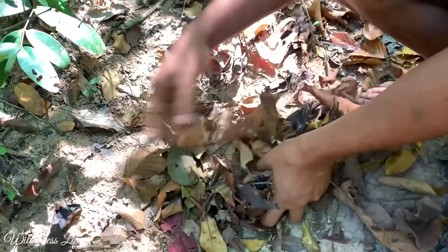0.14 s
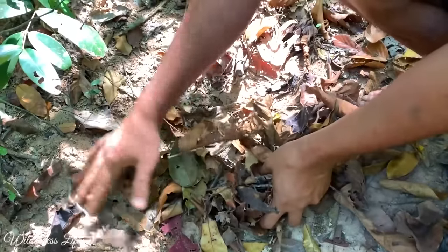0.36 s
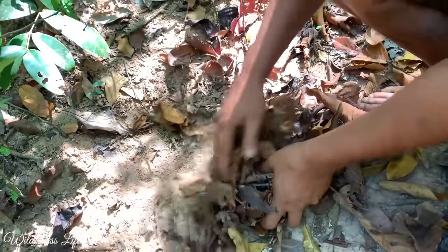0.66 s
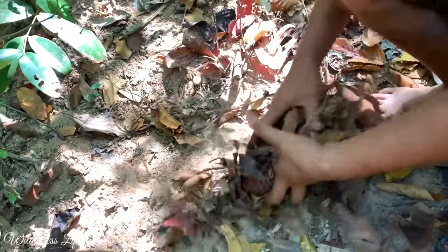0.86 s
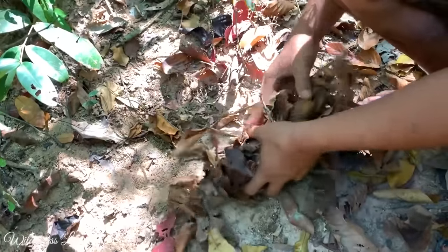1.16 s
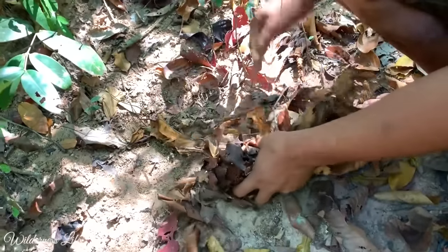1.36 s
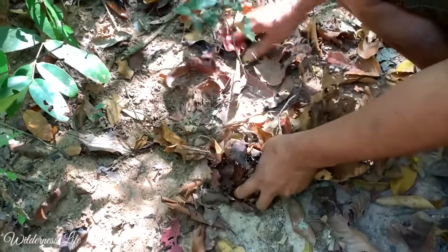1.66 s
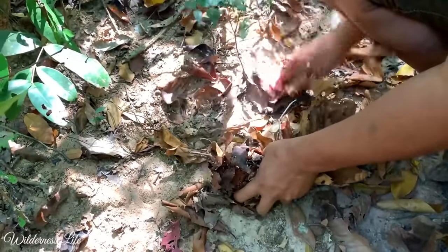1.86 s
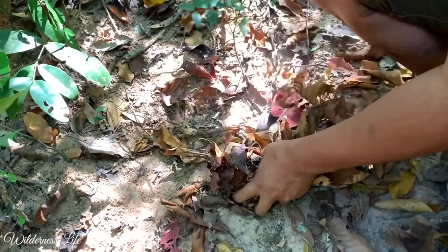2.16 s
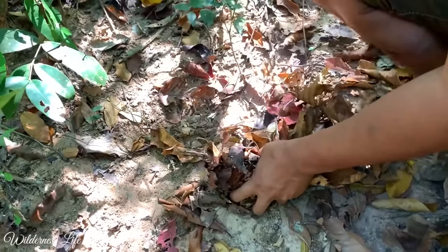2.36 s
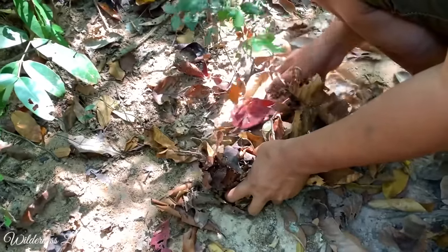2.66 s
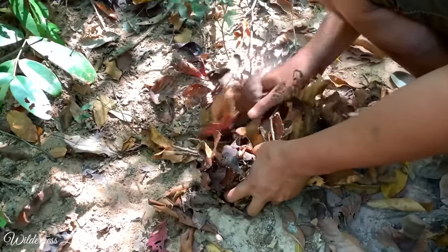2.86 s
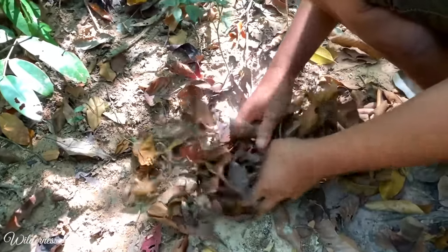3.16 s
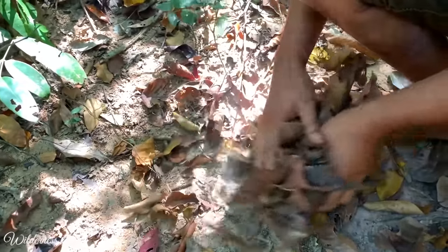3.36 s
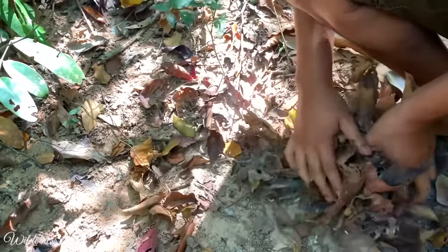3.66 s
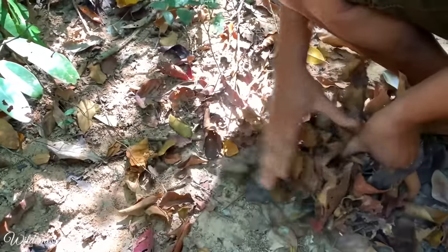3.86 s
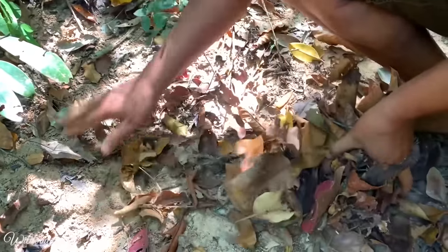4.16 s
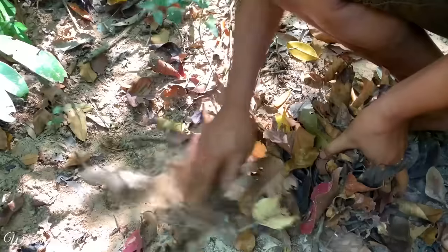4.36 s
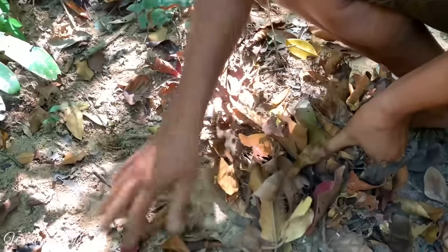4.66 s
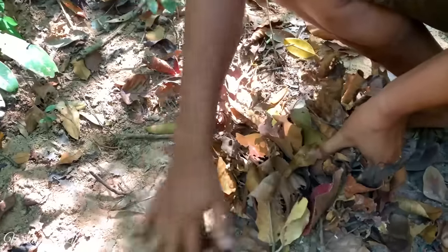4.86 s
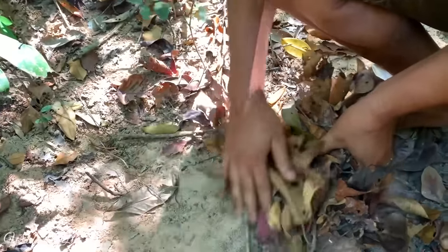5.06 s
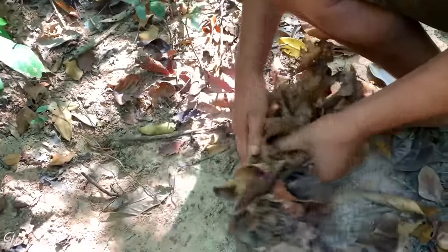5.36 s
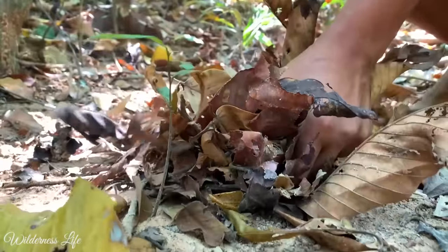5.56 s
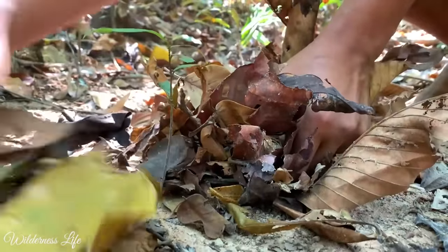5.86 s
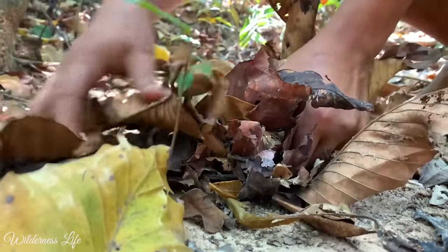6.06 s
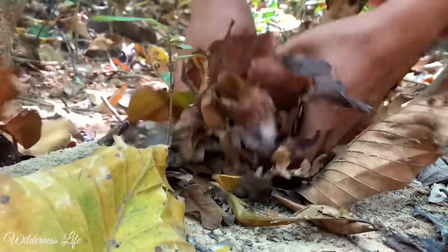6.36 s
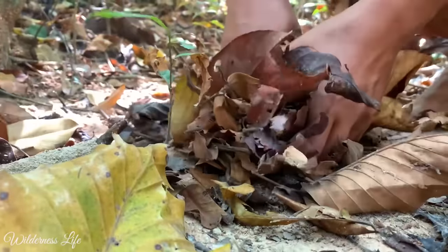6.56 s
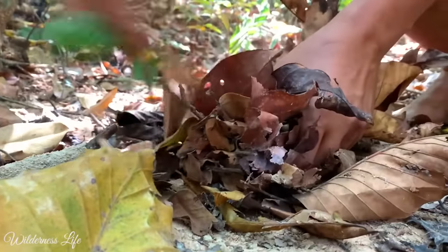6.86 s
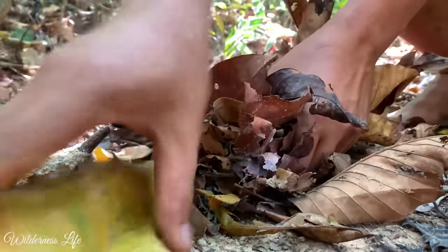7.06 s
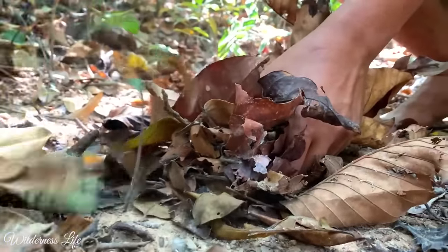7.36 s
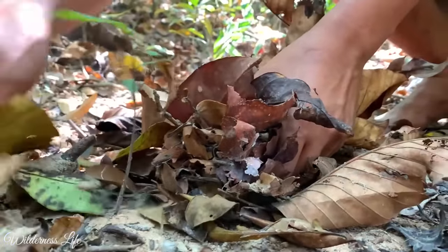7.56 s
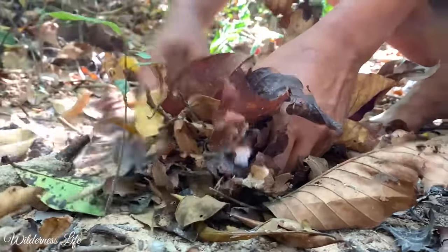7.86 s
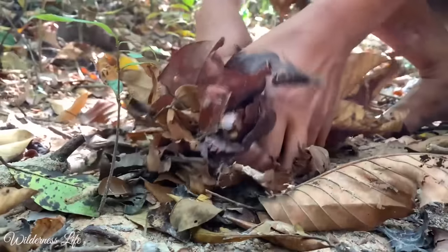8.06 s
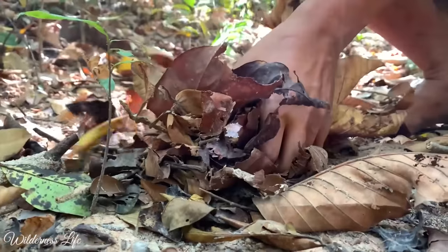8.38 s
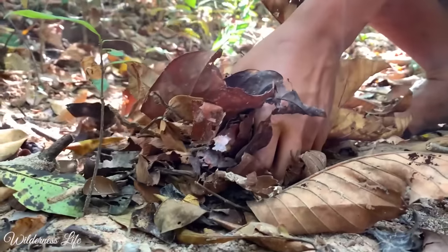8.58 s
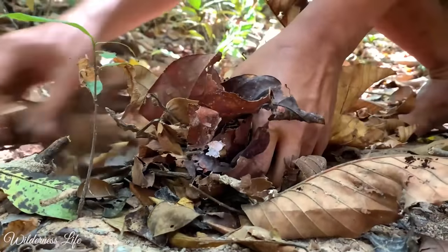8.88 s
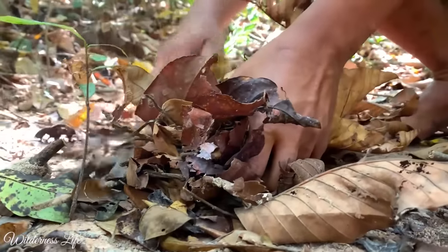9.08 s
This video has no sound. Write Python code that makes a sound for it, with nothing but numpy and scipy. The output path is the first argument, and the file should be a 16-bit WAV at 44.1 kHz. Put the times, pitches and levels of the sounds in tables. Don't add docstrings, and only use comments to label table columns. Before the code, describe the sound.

Bare hands rake through dry leaves on a sandy forest floor, very close to a small stereo camera microphone. Uneven strokes rustle, crackle and snap, with quiet gaps between them and a faint engine drone far off. Just after five seconds the sound drops out for an instant, then resumes closer and stronger, with big leaves flapping low and fingers bumping the soil.

```python
import sys
import numpy as np
from scipy import signal
from scipy.fft import rfft, irfft, next_fast_len
from scipy.io import wavfile
from scipy.ndimage import uniform_filter1d, map_coordinates

SR = 44100
rng = np.random.default_rng(int(sys.argv[2]) if len(sys.argv) > 2 else 0)


def boost(x):
    u = np.asarray(x, float) / 20
    return 10 ** u


def put_to_file(sound):
    columns = np.atleast_2d(sound).T
    safe = np.clip(columns, -1, 1)
    whole_steps = np.round(safe * 32767)
    wavfile.write(sys.argv[1], SR, whole_steps.astype(np.int16))


N = 406585

SILENCE_START_S, SILENCE_END_S = 5.372, 5.493
TREBLE_EDGE_HZ = 7600

# frequency in Hz, level in dB per Hz.
LITTER_SPECTRUM = [(60, -4.5), (150, 0), (450, -2), (750, -7.5), (1100, -4.5), (1500, -5.5), (2300, -1),
                   (5000, 2), (7600, 0.5), (8300, 4.5), (10500, 1), (15500, -0.5)]


def unit(x):
    return x / np.sqrt(np.mean(x ** 2) + 1e-20)


def along(points, hz):
    f, v = np.transpose(points)
    return np.interp(np.log(hz + 1), np.log(f + 1), v)


def curves(rows):
    s, *cols = np.transpose(rows)
    return [np.interp(np.arange(N) / SR, s, c) for c in cols]


def filtered(x, response):
    m = next_fast_len(N + 8192)
    spectrum = rfft(x, m) * response(np.fft.rfftfreq(m, 1 / SR))
    return irfft(spectrum, m)[..., :N]


def below(hz, edge_hz, order=6):
    return 1 / (1 + (hz / edge_hz) ** order)


def swells(at_s, size, rise_s, fall_s):
    kicks = np.bincount(np.minimum((at_s * SR).astype(int), N - 1), size, N)
    t = np.arange(SR // 20) / SR
    shape = np.exp(-t / fall_s) * (1 - np.exp(-t / rise_s))
    return np.abs(signal.fftconvolve(kicks, shape / shape.max())[:N])


def rings(at_s, hz, size, cycles, count):
    k = np.arange(count)
    turns = hz[:, None] * k / SR
    decay = np.exp(-turns / cycles) * (1 - k / count)
    waves = size[:, None] * np.sin(2 * np.pi * turns) * decay
    places = (at_s * SR).astype(int)[:, None] + k
    return np.bincount(places.ravel(), waves.ravel(), N + count)[:N]


def patches(x, size, wide, long, depth_db):
    z = signal.stft(np.pad(x, ((0, 0), (0, size))), nperseg=size)[2]
    field = uniform_filter1d(rng.standard_normal(z.shape[1:]), wide, 0)
    field = uniform_filter1d(field, long, 1)
    return z * boost(depth_db * unit(field))


def drone():
    # time in seconds, level in dB.
    engine_level = [(0.0, -59), (1.25, -61.5), (2.9, -57), (3.1, -56.5), (3.94, -53.5), (4.52, -60),
                    (5.2, -56), (5.6, -55), (5.7, -53), (6.66, -54.5), (7.1, -57.5), (9.22, -62)]
    # frequency in Hz, level in dB per Hz.
    engine_spectrum = [(20, -39), (40, -8.5), (52, -23), (61, 2), (70, -27), (90, -11.5), (200, -44.5)]
    noise = filtered(rng.standard_normal((3, N)), lambda f: boost(along(engine_spectrum, f)))
    return boost(curves(engine_level)[0] + 1.5) * unit(noise)


def bumps():
    # time in seconds, peak in dB, frequency in Hz.
    contacts = [(0.474, -38, 394), (0.516, -38, 347), (0.548, -41.5, 377), (2.314, -41, 427),
                (5.51, -48.5, 200), (6.95, -42, 130), (5.76, -42, 153), (7.178, -34, 95), (7.2, -33.5, 200),
                (7.241, -39, 92), (7.327, -35.5, 231), (7.359, -40, 153), (7.46, -35.5, 113),
                (7.759, -33, 264)]
    at_s, db, hz = np.transpose(contacts)
    knock = rings(at_s, hz, boost(db), cycles=5.3, count=2000)
    return filtered(knock, lambda f: below(f, 700, order=2))


def snaps():
    # time in seconds, peak in dB, ring in Hz, tear in dB re peak.
    wide_breaks = [(0.0706, -11.5, 3180, -23), (0.1292, -3, 4300, -8.5), (0.1379, -16, 1110, -24.5),
                   (0.185, -12, 2700, -9), (0.2098, -16.5, 1480, -14), (0.243, -20.5, 4200, -8),
                   (0.3473, -26, 3300, -12.5), (0.374, -18.5, 4100, -6.5), (0.41, -23.5, 1150, -17),
                   (0.481, -20, 4000, -8.5), (0.517, -23.5, 3460, -5), (0.761, -16, 3800, -12),
                   (1.1242, -14.5, 3300, -11.5), (1.278, -9, 3150, -10.5), (1.4844, -21, 3940, -8),
                   (1.7437, -19.5, 2080, -17), (2.2498, -30.5, 970, -13), (2.3123, -28.5, 3020, -2),
                   (2.3845, -23.5, 2540, -17), (2.413, -27, 1780, -18), (2.7919, -12, 2630, -35),
                   (2.838, -11, 2480, -15), (3.075, -13, 2510, -7), (3.352, -18, 2770, -14.5),
                   (3.637, -42, 3350, -37), (4.1, -22.5, 4100, -8.5), (4.385, -6.5, 5230, -18),
                   (4.8952, -23, 2440, -15), (4.9515, -21, 1550, -32), (5.2958, -22, 3080, -6)]
    close_breaks = [(5.4957, -18, 2150, -11.5), (5.6854, -26, 2130, -9), (5.7664, -7.5, 1510, -20.5),
                    (5.9403, -5, 2120, -25), (6.079, -13, 4610, -22), (6.27, -30, 1240, -12),
                    (6.34, -7, 5130, -12), (6.5583, -13, 1190, -5), (6.6645, -10, 4000, -10),
                    (6.68, -6, 7350, -17), (6.7137, -18.5, 2170, -3.5), (6.758, -13, 1030, -15.5),
                    (6.775, -7, 4400, -13), (6.786, -13.5, 2150, -4), (6.905, -30.5, 880, 3),
                    (7.125, -21, 4260, -11.5), (7.358, -13, 4080, -8.5), (7.424, -28, 3950, -5),
                    (7.451, -14.5, 6450, -11), (7.4694, -4, 4540, -23.5), (7.523, -10.5, 2290, -13),
                    (7.572, -8.5, 2550, -14), (7.6113, -7.5, 1900, -15), (8.129, -19, 1580, 0.5),
                    (8.4483, -21, 4600, -12), (8.5905, -19, 3700, -16), (8.6665, -17, 2420, -13),
                    (8.8593, 1, 2090, -22), (8.969, -21.5, 1140, 3), (9.0513, -11, 5310, -8.5)]
    flap_db, flap_db_per_octave = -9, -9

    at_s, db, hz, tear_db = np.transpose(wide_breaks + close_breaks)
    body_db = tear_db + flap_db + flap_db_per_octave * np.log2(hz / 2500)
    tear = swells(at_s, boost(db + tear_db + 1.5), rise_s=0.00055, fall_s=0.0016)
    tear = tear * rng.standard_normal((3, N))
    tear = filtered(tear, lambda f: boost(along(LITTER_SPECTRUM, f)) * (1 - below(f, 1100)))
    flap = swells(at_s, boost(db + body_db + 3.5), rise_s=0.00072, fall_s=0.0059)
    flap = flap * rng.standard_normal((3, N))
    flap = filtered(flap, lambda f: below(f, 1300) - below(f, 260))
    ring = rings(at_s, hz, boost(db - 9.5), cycles=11.0, count=400)
    ring = ring + rings(at_s + 0.00121, 1.2 * hz, boost(db - 22), cycles=2.8, count=400)
    return tear + flap + ring * [[1], [.5], [.5]]


def litter():
    at, size = rng.random((1800, 2)).T
    clump_size = boost(-6 * np.log(1 - .96 * size))
    clumps = swells(at * N / SR, clump_size, rise_s=0.00073, fall_s=0.0034)
    at, size = rng.random((400, 2)).T
    shove_size = boost(-3.5 * np.log(1 - .93 * size))
    shoves = swells(at * N / SR, shove_size, rise_s=.006, fall_s=.014)
    busy = 0.88 + .48 * unit(clumps) + .27 * unit(shoves)
    rub = rng.standard_normal((3, N))
    place, pitch, size = rng.random((11000, 3)).T
    total = np.cumsum(busy)
    at_s = np.interp(place * total[-1], total, np.arange(N) / SR)
    crack_size = boost(5 * pitch - 4.4 * np.log(1 - .995 * size))
    cracks = rings(at_s, 1300 * boost(18 * pitch), crack_size, cycles=1.8, count=128)
    return unit(busy * rub) + 0.22 * unit(cracks) * [[1], [.7], [-.3]]


def strokes(rows, grabs, feel, bed_db, t):
    start, hold, db, weight_db = np.vstack([rows, grabs]).T[:, :, None]
    slow, sudden, fall, fizz_db, soil_db, soil_grows = feel
    rise = np.repeat([slow, sudden], [len(rows), len(grabs)])[:, None]
    before_s = np.maximum(start - t, 0)
    after_s = np.maximum(t - start - hold, 0)
    force_db = db - rise * before_s - fall * after_s
    shares_db = [soil_db + soil_grows * weight_db, weight_db, 0, fizz_db]
    return np.sqrt([np.sum(boost(force_db + share) ** 2, 0) + boost(bed) ** 2
                    for share, bed in zip(shares_db, bed_db)])


def raking():
    # start in seconds, hold in seconds, rustle in dB, weight on big blades in dB re rustle.
    wide_strokes = [(-0.006, 0.015, -30, -8.5), (0.105, 0.14, -33, -10.3), (0.362, 0.065, -52, -1.5),
                    (0.495, 0.123, -41, -7.5), (0.819, 0.077, -32.5, -9), (1.001, 0.029, -30, -7),
                    (1.145, 0.013, -34, -9), (1.287, 0.0076, -33.5, -9.1), (1.385, 0.1, -44, -7),
                    (1.552, 0.084, -57, -4.5), (1.649, 0.18, -48, -5), (1.935, 0.12, -32.5, -10.2),
                    (2.179, 0.088, -58.5, -2), (2.317, 0.003, -50.5, -3), (2.659, 0.017, -33, -8.5),
                    (2.811, 0.062, -34.5, -7), (2.925, 0.16, -36.5, -7), (3.167, 0.023, -30.5, -8.5),
                    (3.269, 0.098, -42.5, -7), (3.451, 0.17, -46, -7.9), (3.661, 0.043, -33, -7.5),
                    (3.821, 0.12, -44.5, -4.5), (3.961, 0.029, -46, -7.4), (4.062, 0.12, -47, -9.5),
                    (4.268, 0.032, -46.5, -4), (4.414, 0.14, -32, -10.8), (4.682, 0.055, -45, -5.5),
                    (4.806, 0.047, -55, -0.2), (4.961, 0.217, -37, -9), (5.241, 0.336, -35.5, -6.5)]
    close_strokes = [(5.505, 0.063, -48, -3.5), (5.582, 0.07, -55.5, -2), (5.697, 0.027, -47.5, 3),
                     (5.906, 0.1, -27, -4), (6.019, 0.25, -32, -4.0), (6.133, 0.081, -30.5, -5),
                     (6.268, 0.15, -30, -4.5), (6.435, 0.23, -34.5, -0.5), (6.565, 0.061, -35, -15),
                     (6.758, 0.02, -29, -7), (6.867, 0.03, -38, -1.5), (6.964, 0.143, -53, 2.5),
                     (7.056, 0.002, -54.0, -7.9), (7.174, 0.039, -26.5, -9), (7.244, 0.14, -39, -11.4),
                     (7.333, 0.032, -39.5, -8.2), (7.746, 0.139, -27.5, -4), (7.931, 0.037, -30.9, -5.5),
                     (7.995, 0.2, -36.5, -2), (8.219, 0.088, -37, -6), (8.302, 0.029, -40.5, -3.1),
                     (8.441, 0.034, -41, -4.5), (8.59, 0.17, -46.5, -8), (8.886, 0.013, -26, -3),
                     (8.973, 0.062, -34, -26), (9.056, 0.067, -26.5, -9), (9.164, 0.031, -34.5, 0)]
    wide_grabs = [
        (0.635, 0.13, -31.5, -10),
        (1.771, 0.135, -37, -11.0),
        (2.514, 0.11, -36, -6.5),
    ]
    close_grabs = [
        (5.775, 0.095, -33, -3),
        (7.454, 0.0069, -32.5, 0),
        (7.56, 0.15, -29.5, -3),
        (8.677, 0.42, -34, -2.5),
    ]
    # time in seconds, resonance in Hz, strength in dB.
    cupped_hand = [(0, 3500, 3), (2.1, 3600, 3), (2.7, 2700, 4), (3.5, 3550, 3.5), (4.2, 3620, 1.5),
                   (4.4, 5300, 6.5), (4.6, 3600, 4), (5.37, 3600, 4), (5.74, 2500, -2.5), (5.78, 2200, 7),
                   (6, 2300, 1), (6.1, 3900, 0.5), (7.3, 3800, -2), (7.55, 2400, 0.5), (8.4, 3100, -3.5),
                   (8.7, 2250, 5), (8.85, 2250, 8.5), (9.05, 3200, -3.5)]
    # rise, rise of a grab, fall (dB/s), fizz dB, soil dB, soil dB per dB of weight
    wide_feel = (151, 589, 147.5, 1.03, -1.5, 2.14)
    close_feel = (238, 798, 149, -0.6, -11, 0.6)
    wide_bed_db, close_bed_db = (-70.5, -67, -69.5, -66), (-59, -58, -64, -71)

    t = np.arange(0, N, 64) / SR
    wide = strokes(wide_strokes, wide_grabs, wide_feel, wide_bed_db, t)
    close = strokes(close_strokes, close_grabs, close_feel, close_bed_db, t)
    gains = np.where(t < (SILENCE_START_S + SILENCE_END_S) / 2, wide, close)

    heap = patches(litter(), size=512, wide=6, long=6, depth_db=1.5)
    frames = np.minimum(np.arange(heap.shape[2]) * 256, N - 1)
    f = np.fft.rfftfreq(512, 1 / SR)[:, None] + 1
    centre_hz, strength_db = [c[frames] for c in curves(cupped_hand)]
    cup_db = strength_db * np.exp(-(np.log2(f / centre_hz) / .35) ** 2)
    heap = heap * boost(along(LITTER_SPECTRUM, f) + cup_db) * (f < 16100)

    soil, blade = below(f, 500), below(f, 2000)
    rustle = below(f, TREBLE_EDGE_HZ, order=20)
    parts = [soil, blade - soil, rustle - blade, 1 - rustle]
    power = np.mean(np.abs(heap[0]) ** 2, 1, keepdims=True)
    colour = 0
    for gain, part in zip(gains, parts):
        re_rustle = np.interp(frames / SR, t, gain / gains[2])
        colour = colour + re_rustle * part / np.sqrt(np.sum(power * part ** 2))
    force = np.interp(np.arange(N) / SR, t, gains[2])
    return boost(-0.91) * force * signal.istft(heap * colour, nperseg=512)[1][:, :N]


def ports(shared, left, right):
    # time in seconds, lead of the left port in ms.
    hand_place = [(0, 0.052), (.55, 0.047), (.62, 0.084), (.9, 0.013), (3.7, -0.063), (4.3, 0.14),
                  (4.6, 0.068), (5.3, 0.016), (5.75, 0.5), (6.45, 0.056), (6.9, 0.079), (7.05, 0.48),
                  (7.3, 0.15), (7.55, 0.42), (8.05, 0.064), (8.55, 0.14), (8.7, 0.42), (9.2, 0.031)]
    # frequency in Hz, share.
    hand_share = [(100, .6), (1500, .5), (3500, .45), (7000, .4)]
    # frequency in Hz, share.
    folded_share = [(7500, 0.067), (9000, 0.74), (10200, 0.93), (11000, 1), (15500, 1)]
    # frequency in Hz, share.
    held_share = [(100, .72), (700, .74), (1600, .7), (3500, .5), (7000, .3)]
    # frequency in Hz, left minus right in dB.
    body_shade = [(60, -3), (110, -0.5), (200, 0.5), (380, -1.5), (700, 2.5), (1290, 2.5), (2380, 3),
                  (4400, -1.5), (8120, -1.5), (15000, 0.5)]
    held_lead_s = 0.00028
    treble_lag_s, treble_turn_cycles = 1 / 3250, .154

    lead_ms, = curves(hand_place)
    shift = lead_ms * SR / 2000
    heard = np.array([map_coordinates(shared, [np.arange(N) + side * shift], mode="nearest")
                      for side in (1, -1)])

    def low(f):
        return below(f, TREBLE_EDGE_HZ, order=24)

    def share(f):
        return np.clip(low(f) * along(hand_share, f) + (1 - low(f)) * along(folded_share, f), 0, 1)

    def shade(f):
        return boost(np.outer([.5, -.5], along(body_shade, f)))

    def late(f):
        return np.exp(np.outer([-1j, 1j], np.pi * (f * treble_lag_s - treble_turn_cycles)))

    def held_and_own(f):
        held = low(f) * along(held_share, f)
        return [np.sqrt(held) * np.exp(-2j * np.pi * f * held_lead_s), np.sqrt(1 - held)]

    right = filtered(np.array([left, right]), held_and_own).sum(0)
    direct = filtered(heard, lambda f: shade(f) * np.sqrt(low(f) * share(f)))
    folded = filtered(shared, lambda f: shade(f) * late(f) * np.sqrt((1 - low(f)) * share(f)))
    scattered = filtered(np.array([left, right]), lambda f: shade(f) * np.sqrt(1 - share(f)))
    return direct + folded + scattered


def scene():
    return ports(*(drone() + bumps() + snaps() + raking()))


def low_pass(x):
    return signal.sosfilt(signal.butter(12, 16100, fs=SR, output="sos"), x)


def record(dry):
    t = np.arange(N) / SR
    heard = filtered(dry, lambda f: (1 - below(f, 35, order=4)) * (f < 15850))
    fade = 0.038 * boost(-3000 * np.maximum(t - SILENCE_START_S, 0))
    silent = (t > SILENCE_START_S) & (t < SILENCE_END_S)
    return low_pass(heard * np.where(silent, fade, 1))


dry = scene()
out = record(dry)
put_to_file(out)
```